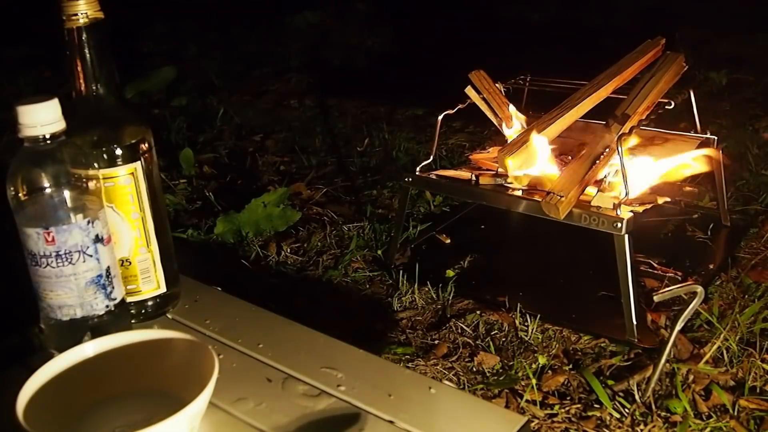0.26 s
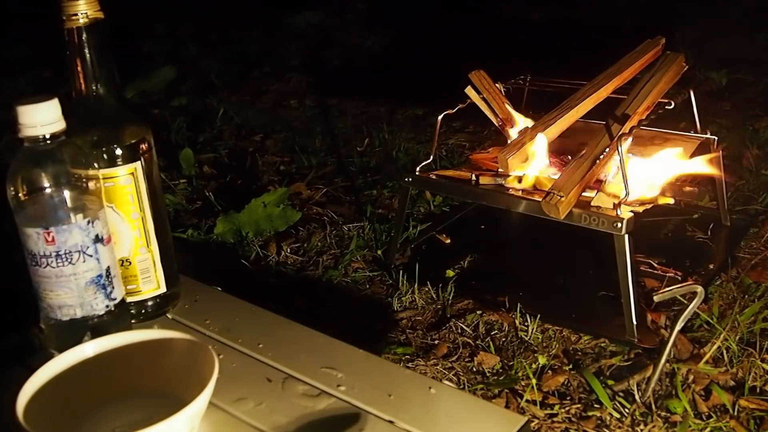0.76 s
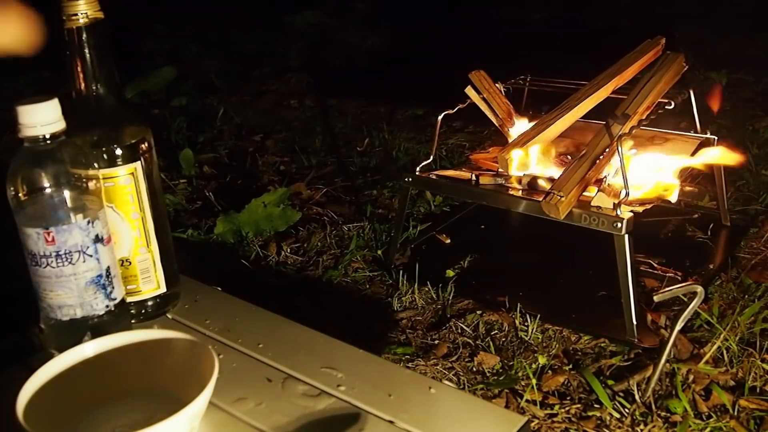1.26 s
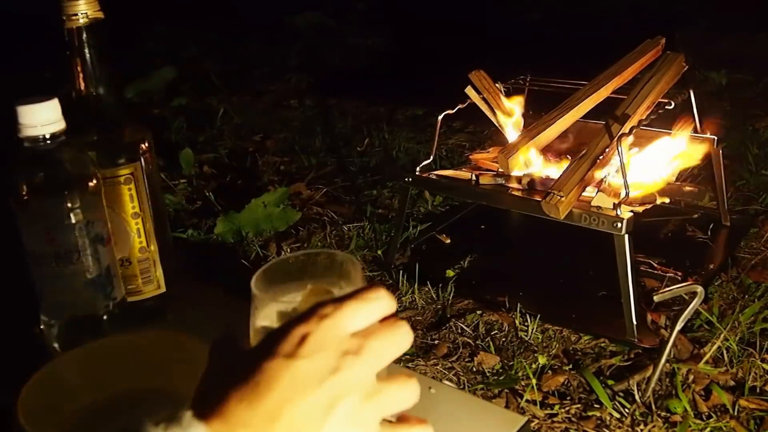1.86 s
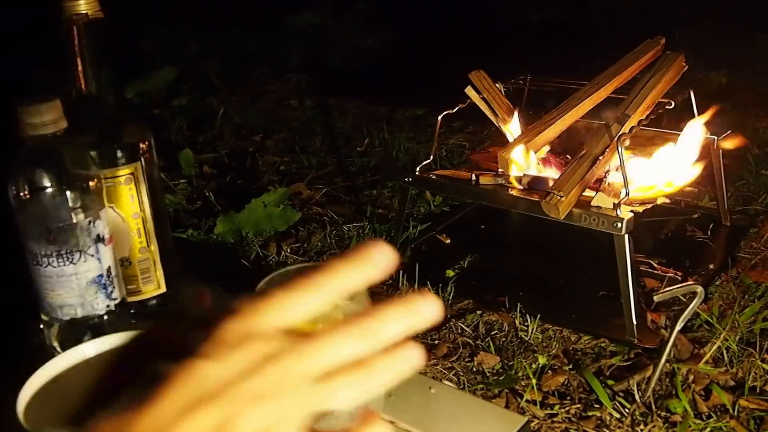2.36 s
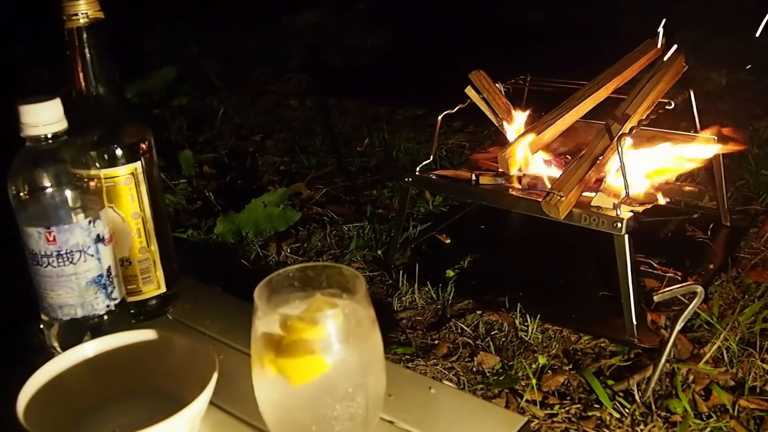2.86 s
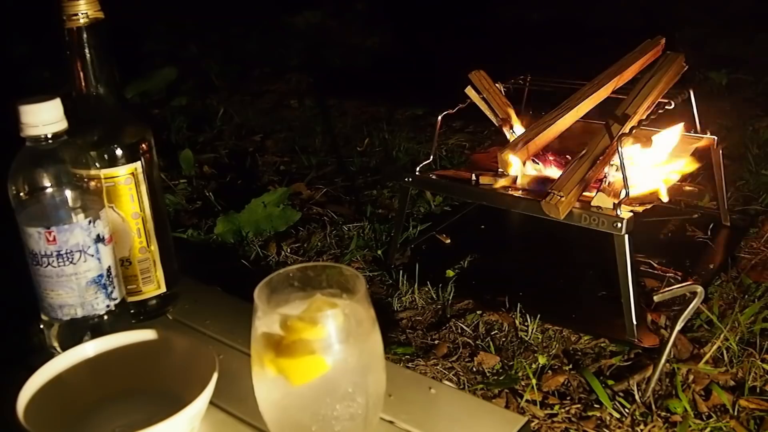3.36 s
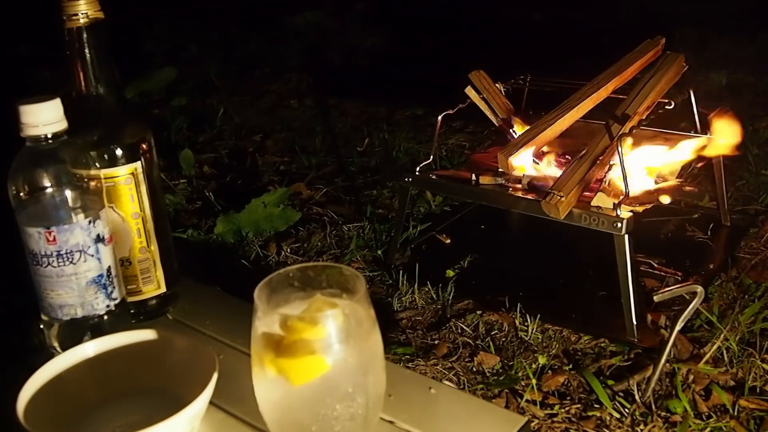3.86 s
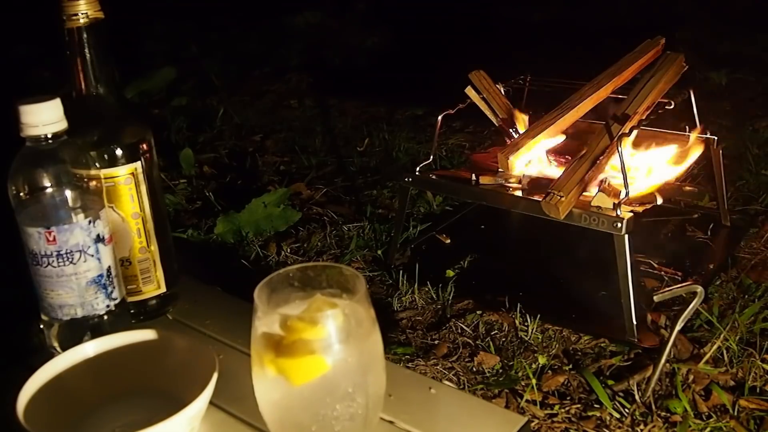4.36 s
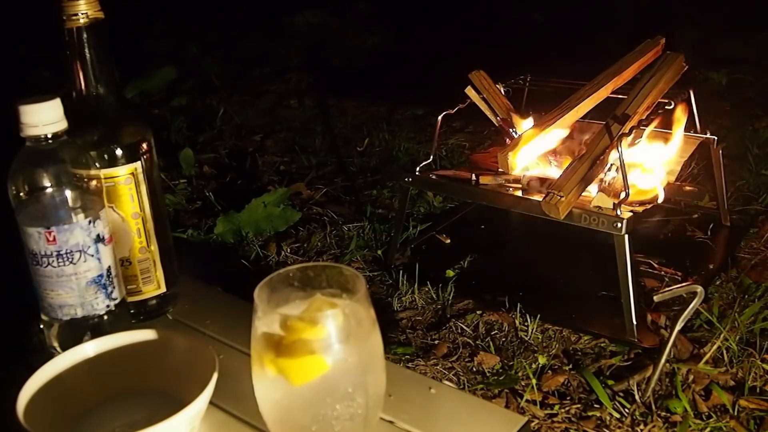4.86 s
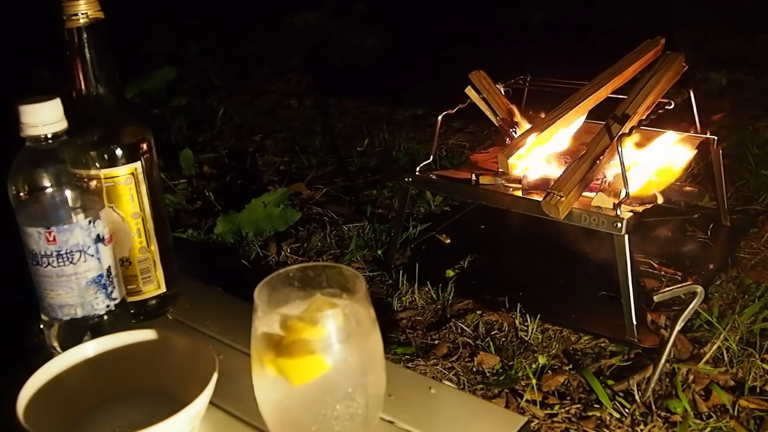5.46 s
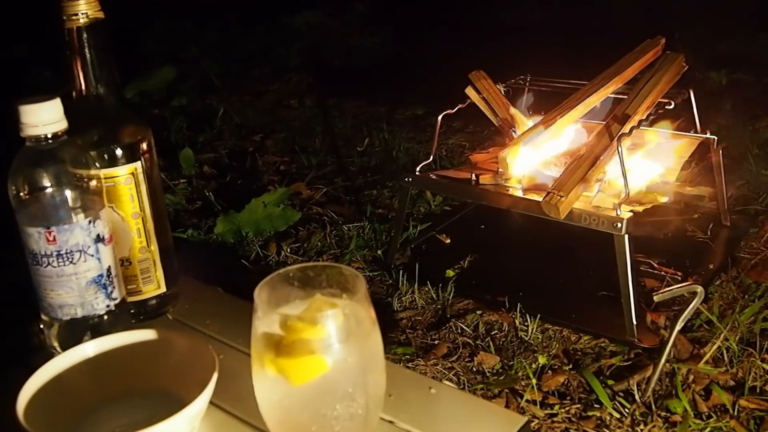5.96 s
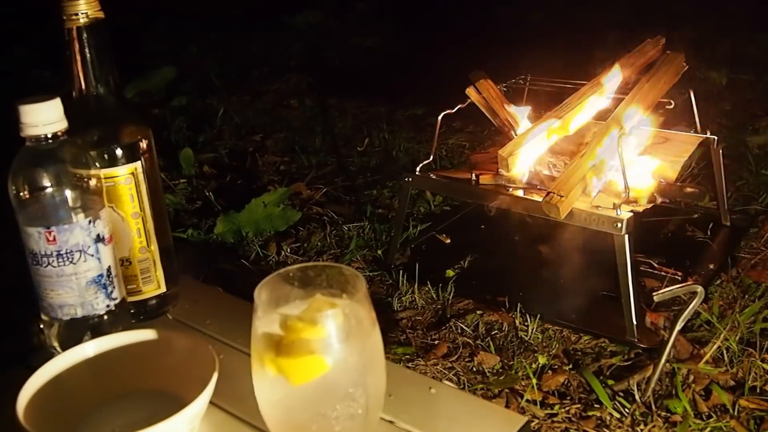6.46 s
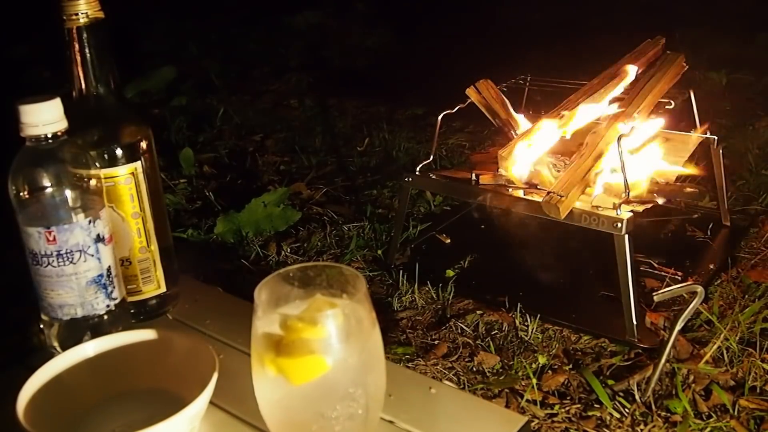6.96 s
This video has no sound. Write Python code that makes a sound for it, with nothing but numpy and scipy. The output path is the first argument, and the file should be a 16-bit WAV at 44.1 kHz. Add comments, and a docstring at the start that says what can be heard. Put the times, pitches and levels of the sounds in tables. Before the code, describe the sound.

Outdoors at night, crickets trill throughout over a soft distant rush and low fire rumble. Nearby wood ticks and pops. About two seconds in, a glass taps onto the camp table, followed by the loudest crack and a steam hiss. Metalware then clatters briefly with soft table bumps. Near the end the flames roar gently and faster crickets join. Close stereo microphone at the table.

```python
"""Night at a camp table: a wood fire in a steel pit pops and ticks over a distant rush, low rumble and faint drone.
Field crickets trill from the start, as rows of wing strokes scattered by foliage; the pops are short noise bursts.
Near 2 s a glass is set down, ringing its modes; then comes the loudest crack, with the first puff of steam noise.
Just after 3 s metalware clatters and the table is bumped, each blow ringing a bank of decaying modes.
Past 5.5 s the flames roar up and fast tree crickets join. The recorder's gain ducks at the loudest cracks."""
import sys
import numpy as np
from scipy import signal
from scipy.fft import rfft, irfft, next_fast_len
from scipy.io import wavfile
from scipy.ndimage import uniform_filter1d

SR = 44100
rng = np.random.default_rng(int(sys.argv[2]) if len(sys.argv) > 2 else 0)


def waveform_to_disk(signal):
    """Save audio, clipped to [-1, 1], as 16-bit WAV at the path in sys.argv[1]."""
    frames = np.transpose(np.atleast_2d(signal))
    scaled = np.clip(frames, -1, 1) * 32767
    samples = np.round(scaled).astype(np.int16)
    wavfile.write(sys.argv[1], SR, samples)


N = 318843
TIME = np.arange(N) / SR


def undb(db):
    """Decibels to gain."""
    return 10 ** (np.asarray(db) / 20)


def unit(x):
    """Scale to rms 1."""
    return x / np.sqrt(np.mean(x ** 2))


def ramp(t, length_s):
    """Rise from 0 at t = 0 to 1 over the given length, then hold."""
    return np.clip(t / length_s, 0, 1)


def curves(rows):
    """Each column of a table of (seconds, ..) rows, drawn as straight lines sample by sample."""
    s, *columns = np.transpose(rows)
    return [np.interp(TIME, s, column) for column in columns]


def response(points, size):
    """Gain at each FFT bin of a spectrum given as (Hz, dB) points."""
    hz, db = np.transpose(points)
    bins_hz = np.fft.rfftfreq(size, 1 / SR) + 1
    return undb(np.interp(np.log(bins_hz), np.log(hz), db))


def colour(x, points):
    """Causal, minimum-phase filter with the given spectrum, built by folding its cepstrum."""
    size = 2 * x.shape[-1]
    cepstrum = irfft(np.log(response(points, size)))
    cepstrum[1:size // 2] *= 2
    cepstrum[size // 2 + 1:] = 0
    filtered = irfft(rfft(x, size) * np.exp(rfft(cepstrum)))
    return filtered[..., :size // 2]


def walk(rate):
    """Smooth random wander of rms near 1, aiming at a new value `rate` times per second."""
    hold = max(int(SR / rate), 2)
    steps = np.repeat(rng.standard_normal(N // hold + 1), hold)
    return unit(uniform_filter1d(steps, hold)[:N])


def add(out, s, sound):
    """Mix a sound in from time s."""
    i = int(s * SR)
    out[:, i:i + sound.shape[-1]] += sound[..., :N - i]


def pan(db):
    """Channel gains for a left-minus-right level."""
    return undb(np.array([[db], [-db]]) / 2)


# Stereo width of the diffuse noise. Each row: frequency in Hz, side minus mid in dB.
WIDTH = [(60, -15.5), (110, -17), (200, -23), (380, -23), (700, -23), (1290, -12), (2380, -6.5), (4400, -3),
         (8120, 3.5), (15000, -2)]


def diffuse(points, flicker_db, flicker_rate):
    """Stereo noise whose octaves flicker on their own; the bass is nearly alike in both channels."""
    size = next_fast_len(N, True)
    mid, side = rfft(rng.standard_normal((2, size))) * response(points, size)
    width = response(WIDTH, size)
    spectrum = np.array([mid + width * side, mid - width * side]) / np.sqrt(1 + width ** 2)
    octave = np.log2(np.clip(np.fft.rfftfreq(size, 1 / SR), 32, 16384))
    out = np.zeros((2, N))
    for k in range(5, 15):
        # overlapping triangles, one octave apart, that sum to 1
        weight = np.maximum(1 - abs(octave - k), 0)
        band = irfft(spectrum * weight, size)[:, :N]
        out += band * undb(flicker_db * walk(flicker_rate))
    return unit(out)


# Spectrum of the distant rush. Each row: frequency in Hz, relative level in dB.
RUSH_COLOUR = [(200, -34), (400, -10), (550, -4.5), (760, -1), (1000, -1.5), (1300, -3), (1570, -1.5),
               (2000, -6.5), (2600, -7), (3200, -5), (4200, -10), (5800, -7.5), (7800, -12), (15500, -19)]
# Spectrum of the flames' rumble. Each row: frequency in Hz, relative level in dB.
RUMBLE_COLOUR = [(15, -51), (25, -26.5), (36, -22), (46, -6), (81, -4.5), (156, 2), (275, -2.5),
                 (316, -6.5), (356, -13.5), (420, -26), (550, -17), (920, -120)]
# Slow level moves of rush and rumble together. Each row: time in seconds, gain in dB.
BACKGROUND_GAIN = [(0, 0.04), (1.4, 0.64), (2.3, -1.6), (3, 0.8), (4.3, -0.9), (5.3, 0.37), (7.2, -0.8)]
RUSH_DB, RUMBLE_DB = -33, -41  # rms before the slow gain and the pan


def background():
    """The far rush of the night and the rumble of the flames, both as coloured, flickering noise."""
    # the added point rolls off the bass of the rush
    rush_points = [(40, -58)] + list(RUSH_COLOUR)
    rush = undb(RUSH_DB) * diffuse(rush_points, flicker_db=0.72, flicker_rate=16) * pan(db=-2.0)
    rumble = undb(RUMBLE_DB) * diffuse(RUMBLE_COLOUR, flicker_db=1.14, flicker_rate=8) * pan(db=-0.7)
    return undb(curves(BACKGROUND_GAIN)[0]) * (rush + rumble)


DRONE_HZ, DRONE_DB = 56.5, -55.5  # centre pitch, peak level


def drone():
    """A faint low sine whose pitch wanders a little, 0.6 rad apart between the channels."""
    pitch = DRONE_HZ + 0.9 * walk(4.6)
    phase = 2 * np.pi * np.cumsum(pitch) / SR
    return undb(DRONE_DB) * np.sin(phase + np.array([[0], [.6]]))


def trill(hz, rate, sweep_hz, duty, jitter, scatter_db, wander_hz):
    """Each closing stroke of the wings rings them at a pitch that sags as the stroke slows; no two are alike."""
    size = len(hz)
    cycle = rng.random() + np.cumsum(rate * (1 + jitter * walk(30)[:size])) / SR
    stroke = np.minimum(cycle % 1 / duty, 1)  # 0 to 1 through a stroke, then silent
    # one pair of random values per stroke: pitch and level
    chance = rng.standard_normal((int(cycle[-1]) + 1, 2))
    pitch_chance, level_chance = chance[cycle.astype(int)].T
    sag = stroke ** 2 - 1 / 4
    pitch = hz - sweep_hz * sag + wander_hz * pitch_chance
    phase = 2 * np.pi * np.cumsum(pitch) / SR
    # the scraper catches the teeth of the file unevenly
    rasp_db = 2.5 * walk(300)[:size]
    stroke_db = scatter_db * np.tanh(level_chance)
    swing = np.abs(np.sin(np.pi * stroke)) ** .5 * undb(stroke_db + rasp_db)
    return unit(swing * (np.sin(phase) + undb(-26) * np.sin(2 * phase)))


def foliage(x, near_s=0.013, far_t60_s=0.44, far_db=-18):
    """A call arrives directly, then scattered by grass and trees along different paths to each channel."""
    t = np.arange(SR // 2) / SR
    decay = np.exp(-t / near_s) + undb(far_db - 60 * t / far_t60_s)
    paths = rng.standard_normal((2, len(t))) * decay
    scattered = signal.fftconvolve(x[None], paths, axes=1)[:, :N]
    direct = np.array([np.roll(x, 1), x])  # left one sample later
    both = direct + 2.0 * scattered * np.std(x) / np.std(scattered, axis=1, keepdims=True)
    return both * np.std(x) / np.std(both, axis=1, keepdims=True)


# Late tree crickets. Each row: start in seconds, pitch in Hz, strokes per second, level in dB on entering.
TREE_CRICKETS = [(5.949, 4965., 88, -37.5), (6.0, 4737, 61, -40)]
TREE_ENTRY_S, TREE_SWELL_DB_PER_S = 0.13, 4.5  # they fade in, and grow steadily louder
TREE_SWEEP_HZ, TREE_WIDEN_HZ_PER_S = 120, 220  # drop in pitch per stroke on entering, and its growth


def chorus(far_db=-43.5):
    """A far cricket trills throughout; fast tree crickets join it, ever louder and wider in pitch."""
    far = trill(np.full(N, 4760.), rate=40, sweep_hz=281.4, duty=0.94, jitter=0.14,
                scatter_db=0.0, wander_hz=69.8)
    out = undb(far_db) * far
    for start, hz, rate, db in TREE_CRICKETS:
        age = np.maximum(TIME - start, 0)
        sweep_hz = TREE_SWEEP_HZ + TREE_WIDEN_HZ_PER_S * age
        call = trill(np.full(N, hz), rate, sweep_hz, duty=.9, jitter=0.09, scatter_db=2.5, wander_hz=55.3)
        out = out + ramp(age, TREE_ENTRY_S) * undb(db + TREE_SWELL_DB_PER_S * age) * call
    return foliage(out) * pan(db=-2.0)


SWELL_S, FADE_S = .07, 0.058  # attack and release of every phrase


def phrase(start, end):
    """The times within a cricket's phrase, and its swell, hold and fade."""
    t = TIME[(TIME >= start) & (TIME < end)]
    return t, ramp(t - start, SWELL_S) * ramp(end - t, FADE_S)


# Phrases of the gliding cricket. Each entry: start in seconds.
GLIDE_PHRASES = [-.2, .378, 1.08, 1.7, 2.3, 2.74, 3.23, 3.869, 4.259, 4.653, 5.169, 5.5]
GLIDE_HZ, GLIDE_RISE_HZ, GLIDE_RISE_S = 4910, 320, .12  # final pitch, climb to it, time constant of the climb
GLIDE_DB = -37
GLIDE_LONGEST_S, GLIDE_OVERLAP_S = .8, .005  # a phrase ends at this length, or just as the next begins
# Phrases of the answering cricket. Each row: start in seconds, length in seconds, level in dB.
ANSWER_PHRASES = [(-.15, 0.32, -35), (.52, .31, -34), (1.17, 0.31, -34), (1.55, .69, -41.5),
                  (2.8, 0.31, -33), (3.48, 0.37, -40), (3.95, 0.265, -34.5), (4.85, .24, -34),
                  (5.65, 0.24, -31.5), (6.65, 0.46, -38.5)]
ANSWER_HZ = 4845


def field_crickets():
    """One cricket climbs in pitch through each phrase, with short bent strokes; the other holds a purer note."""
    glider, answerer = np.zeros((2, 1, N))
    next_starts = list(GLIDE_PHRASES)[1:] + [np.inf]
    for start, following in zip(GLIDE_PHRASES, next_starts):
        t, effort = phrase(start, min(start + GLIDE_LONGEST_S, following + GLIDE_OVERLAP_S))
        pitch = GLIDE_HZ - GLIDE_RISE_HZ * np.exp(-(t - start) / GLIDE_RISE_S)
        call = trill(pitch, rate=28.5, sweep_hz=270, duty=.7, jitter=.1, scatter_db=2.0, wander_hz=30)
        add(glider, t[0], undb(GLIDE_DB) * effort * call)
    for start, length, db in ANSWER_PHRASES:
        t, effort = phrase(start, start + length)
        pitch = np.full(len(t), ANSWER_HZ)
        call = trill(pitch, rate=29.2, sweep_hz=60, duty=.85, jitter=.1, scatter_db=1.5, wander_hz=12)
        add(answerer, t[0], undb(db) * effort * call)
    return (foliage(glider[0]) + foliage(answerer[0])) * pan(db=-4.0)


# Contact noise of a blow. Each row: frequency in Hz, relative level in dB before the blow's softness.
SCUFF_COLOUR = [(150, -30), (420, -15.5), (750, -0.5), (1300, -1), (3500, -9), (7000, -12.5), (16000, -9)]


def strike(modes, bright_hz, scuff_db, scuff_s, contact_s, spread):
    """One blow rings the modes, the high ones less if it is soft; the contact adds a short scuff."""
    t = np.arange(SR * 2 // 3) / SR
    hz, db, t60 = np.transpose(modes)[:, :, None]
    # no two blows excite the modes quite alike
    gain = undb(db + 1.5 * rng.standard_normal(hz.shape)) / np.hypot(1, hz / bright_hz)
    # short waves reach the two channels out of step
    skew = spread * np.sqrt(hz / 1000) * rng.standard_normal((2, len(hz), 1))
    phase = 2 * np.pi * rng.random(hz.shape) + skew
    ring = (gain * undb(-60 * t / t60) * np.sin(2 * np.pi * hz * t + phase)).sum(axis=1)
    noise = rng.standard_normal(len(t)) + .5 * rng.standard_normal((2, len(t)))
    grit = noise * np.exp(-t / scuff_s)
    softened = [(f, level - 10 * np.log10(1 + (f / bright_hz) ** 2)) for f, level in SCUFF_COLOUR]
    scuff = colour(grit, softened)
    onset = 1 - np.exp(-t / contact_s)
    return (ring / 2 + undb(scuff_db) * scuff) * onset


# The glass meets the table. Each row: time in seconds, relative level in dB.
GLASS_TAPS = [(1.9411, -10), (1.9429, -7), (1.949, -15)]
# Modes of glass on table. Each row: frequency in Hz, relative level in dB, 60 dB decay in seconds.
GLASS_MODES = [(380, -11, 0.033), (547, -5.5, .03), (1006, 0, 0.063), (1180, -1, 0.054), (1260, -5, 0.12),
               (1380, 1, .04), (1568, 5, 0.042), (2140, -11, 0.058), (3285, 5.5, 0.015), (4000, -9, 0.043),
               (5917.8, -16, 0.27), (6500, 1, 0.035), (6980, 4, 0.021), (10100, -33, .025),
               (11400, -32, .02)]


def glass():
    """A glass lands with a quick rattle of hard, bright taps."""
    out = np.zeros((2, N))
    for s, db in GLASS_TAPS:
        tap = strike(GLASS_MODES, bright_hz=12000, scuff_db=1.5, scuff_s=0.0069, contact_s=0.00016, spread=0.25)
        add(out, s, undb(db) * pan(db=-1.5) * tap)
    return out


# Modes of the metalware. Each row: frequency in Hz, relative level in dB, 60 dB decay in seconds.
METAL_MODES = [(580, -20, .08), (686, -14, 0.077), (760, -14, .22), (848, -4, 0.22), (927, -3, 0.11),
               (1050, -3, 0.044), (1200, -15, .1), (1520, -14.5, 1.2), (1595, -15, 0.41),
               (1960, -23.5, 1.1), (2095, -10.5, 0.3), (2350, -12, .08), (3200, 5, 0.031), (3610, 1, 0.03),
               (5880, 1, 0.028)]
NOTE_DB, OVERTONE_DB = 10.5, -10  # the hollow note and its neighbour, on the scale of the metal's modes


def knock(bright_hz, note_hz):
    """A blow on the metalware rings its modes and the hollow note of the spot struck."""
    modes = list(METAL_MODES) + [(note_hz, NOTE_DB, .035), (1.11 * note_hz, OVERTONE_DB, .03)]
    # a duller blow stays in contact longer
    return strike(modes, bright_hz, scuff_db=10.5, scuff_s=0.0051, contact_s=2.0 / bright_hz, spread=0.24)


# Metalware knocks. Each row: time in seconds, relative level in dB, brightness in Hz,
# hollow note of the spot struck in Hz.
METAL_KNOCKS = [(3.110, -20, 700, 825), (3.133, -18.5, 1290, 630), (3.1493, -13, 6070, 796),
                (3.2015, -13.5, 2000, 990), (3.222, -24, 2200, 1080), (3.2318, -16.5, 2000, 745),
                (3.2534, -16, 2400, 1000), (3.292, -26, 1500, 1520), (3.3735, -22, 2200, 744),
                (3.386, -23.5, 2000, 1040), (3.403, -21, 1600, 758)]
RATTLE_S, RATTLE_SPREAD_S, RATTLE_DB = 3.19, .18, -26.5  # light touches: middle, half length, level there


def metalware(count=14, rattle_edge_db=-7):
    """Metalware clatters in hard knocks amid light touches that thin in level away from the middle."""
    out = np.zeros((2, N))
    for s, db, bright_hz, note_hz in METAL_KNOCKS:
        add(out, s, undb(db) * knock(bright_hz, note_hz))
    for k, (when, spot) in enumerate(rng.random((count, 2))):
        place = 2 * (k + when) / count - 1  # -1 to 1 across the rattle
        touch = knock(bright_hz=1900, note_hz=750 + 350 * spot)
        touch_db = RATTLE_DB + rattle_edge_db * place ** 2
        add(out, RATTLE_S + RATTLE_SPREAD_S * place, undb(touch_db) * touch)
    return out


# Soft bumps on the table. Each row: time in seconds, relative level in dB.
TABLE_BUMPS = [(3.111, -27), (3.135, -31), (3.748, -27.5), (3.757, -37)]
# Modes of the table. Each row: frequency in Hz, relative level in dB, 60 dB decay in seconds.
TABLE_MODES = [(255, 6.5, 0.1), (316, 8.5, .14), (770, -11, 0.066), (1180, 5.5, 0.18)]


def table_bumps():
    """Soft, slow contacts ring the low modes of the table."""
    out = np.zeros((2, N))
    for s, db in TABLE_BUMPS:
        bump = strike(TABLE_MODES, bright_hz=1500, scuff_db=-5, scuff_s=.008, contact_s=0.002, spread=0.17)
        add(out, s, undb(db) * bump)
    return out


# Spectrum of the roaring flames. Each row: frequency in Hz, relative level in dB.
FLARE_COLOUR = [(120, -30), (220, 1), (300, 3), (420, -25), (900, -45)]
FLARE_S, FLARE_RISE_S, FLARE_DB = 5.53, 1., -44.5  # start, time to full strength, full level


def flare():
    """The flames climb the logs and roar: low noise that flutters and swells in."""
    roar = diffuse(FLARE_COLOUR, flicker_db=2.5, flicker_rate=8)
    return undb(FLARE_DB) * ramp(TIME - FLARE_S, FLARE_RISE_S) * roar


# Small woody snaps in the logs. Each row: time in seconds, relative level in dB, pitch in Hz.
LOG_SNAPS = [(.855, -21, 2200), (1.247, -18, 3200), (1.32, -16, 3300)]
# Modes shared by the snaps. Each row: frequency in Hz, relative level in dB, 60 dB decay in seconds.
SNAP_MODES = [(600, -16, 0.027), (1400, -15, 0.0185), (4390, -6, 0.014)]


def snaps():
    """Fibres part deep in a log and ring it briefly."""
    out = np.zeros((2, N))
    for s, db, hz in LOG_SNAPS:
        modes = list(SNAP_MODES) + [(hz, 2, .02)]
        snap = strike(modes, bright_hz=6000, scuff_db=4, scuff_s=0.0014, contact_s=0.00018, spread=0.26)
        add(out, s, undb(db) * snap)
    return out


# Puffs of steam escaping from the logs. Each row: start in seconds, length in seconds, level in dB at its middle.
STEAM_PUFFS = [(2.595, 0.15, -27.5), (3.015, .094, -36), (3.116, .16, -33), (5.329, 0.19, -39),
               (5.824, 0.071, -27.5), (5.941, 0.083, -35)]
# Spectrum of the steam. Each row: frequency in Hz, relative level in dB.
STEAM_COLOUR = [(1500, -18), (3000, 8.5), (7000, -2), (11000, 2), (15000, -4)]


def steam():
    """Gas hisses out in short, sputtering puffs of coloured noise."""
    out = np.zeros((2, N))
    for s, length, db in STEAM_PUFFS:
        size = int(length * SR)
        sputter = undb(3.34 * walk(300)[:size])
        hiss = unit(colour(rng.standard_normal((2, size)), STEAM_COLOUR))
        add(out, s, undb(db) * np.hanning(size) * sputter * hiss)
    return out


# Spectrum of a pop's crack. Each row: frequency in Hz, relative level in dB.
CRACK_COLOUR = [(1500, -2), (4000, 0), (6000, 4.5), (8500, 2.5), (11000, 3.5), (13500, 3), (16000, -30)]
# Spectrum of a pop's woody body. Each row: frequency in Hz, relative level in dB.
BODY_COLOUR = [(150, -24), (500, -11), (1000, 0.5), (1800, 9), (3000, -2.5), (5500, 12.5), (8000, -24),
               (15000, -4)]
BURST_S, SCATTER_S, SCATTER_DB = .00035, .002, -13  # decay of the burst, decay and level of its scatter


def pop(body_db, ground_db=-36, ground_s=0.017):
    """A gas pocket bursts: a sharp fracture and a push on the wood, scattered by logs and steel walls."""
    t = np.arange(2048) / SR
    scatter = undb(SCATTER_DB) * np.exp(-t / SCATTER_S)
    ground = undb(ground_db) * np.exp(-t / ground_s)
    shape = np.exp(-t / BURST_S) + scatter + ground
    # each noise is partly shared by the two channels
    fracture = rng.standard_normal((2, len(t))) + .5 * rng.standard_normal(len(t))
    crack = colour(fracture * shape, CRACK_COLOUR)
    rustle = .5 * rng.standard_normal(len(t)) + 0.43 * rng.standard_normal((2, len(t)))
    push = -3 * np.exp(-t / 0.00014) + shape * rustle
    body = colour(push, BODY_COLOUR)
    return (unit(crack) + undb(body_db) * unit(body)) * np.sqrt(np.mean(shape ** 2))


# The clearest wood pops. Each row: time in seconds, relative crack level in dB,
# woody body relative to the crack in dB.
WOOD_POPS = [(.398, -18, -18), (1.1547, -10.5, -18), (1.4496, -22, -16), (2.0218, -25.5, -14),
             (2.2243, -18, -22), (2.6198, 10, -6), (3.869, -13, -25), (3.9471, -13.5, -18),
             (4.616, -20, -17), (4.755, -16, -21), (5.1053, -20.5, -14), (5.684, -12.5, -24),
             (5.85, -19.5, -2.5), (5.962, -22.5, -13), (6.0804, 0, 1.5), (6.2546, -9, -15.5),
             (6.2591, -18.5, -7), (6.7446, -17, -15.5), (7.1935, -7.5, -18)]


def fire(tick_db=-40, tick_spread_db=3, count=45):
    """Loud pops, a random scatter of faint ticks with a few stronger ones, and puffs of steam."""
    out = steam()
    for s, db, body_db in WOOD_POPS:
        add(out, s, undb(db) * pop(body_db))
    for when, size in rng.random((count, 2)):
        level_db = tick_db - tick_spread_db * np.log(max(size, .03))
        add(out, when * (N - 1) / SR, undb(level_db) * pop(body_db=-6))
    return out * pan(db=-1.0)


def scene():
    """Rush, rumble and drone lie beneath the insects, the things on the table and the fire."""
    night = background() + drone() + chorus() + field_crickets()
    table = glass() + metalware() + table_bumps()
    return night + table + flare() + snaps() + fire()


TOP_HZ = 15900  # upper edge of the recorder's band


def record(dry, limit_db=-17, release_db_per_s=58, window_s=0.014):
    """Gain control looks just ahead, ducks at a loud crack and creeps back; peaks clip and the top is cut."""
    # the window is centred, so the gain moves slightly early
    power = uniform_filter1d(np.mean(dry ** 2, axis=0), max(int(window_s * SR), 1))
    excess_db = np.maximum(10 * np.log10(np.maximum(power, 1e-12)) - limit_db, 0)
    # a running maximum over a tilted line gives instant duck and steady release
    recovery = release_db_per_s * TIME
    duck_db = np.maximum.accumulate(excess_db + recovery) - recovery
    held = np.clip(dry * undb(-duck_db), -1, 1)
    top_cut = signal.ellip(8, .2, 70, TOP_HZ, fs=SR, output="sos")
    return signal.sosfilt(top_cut, held)


dry = scene()
out = record(dry)
waveform_to_disk(out)
```